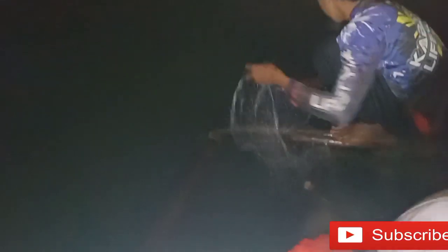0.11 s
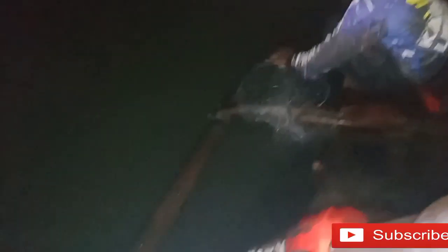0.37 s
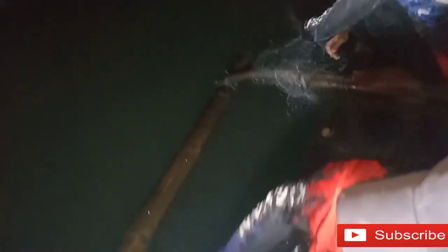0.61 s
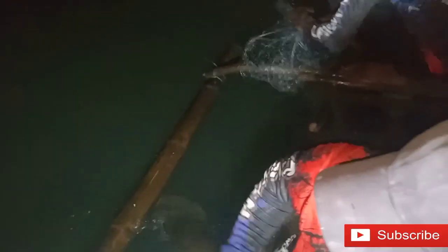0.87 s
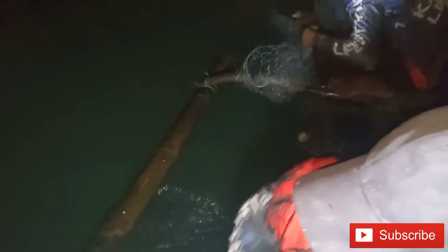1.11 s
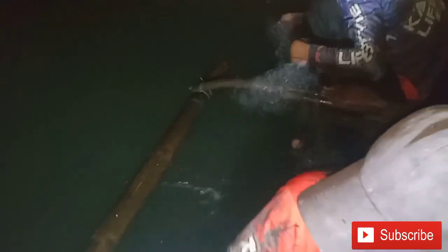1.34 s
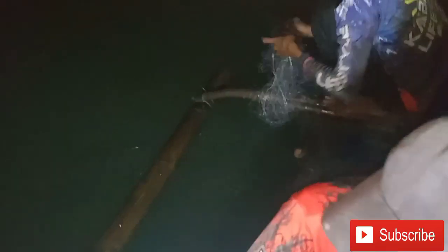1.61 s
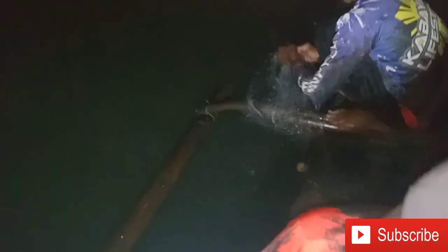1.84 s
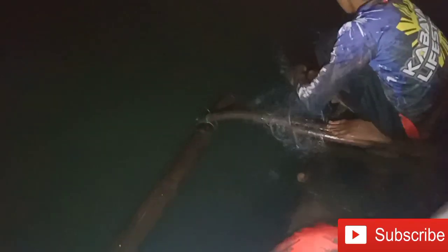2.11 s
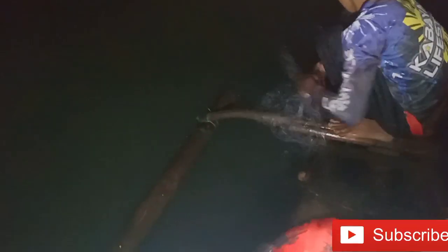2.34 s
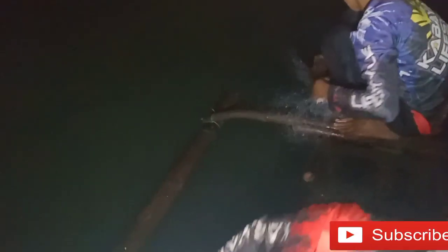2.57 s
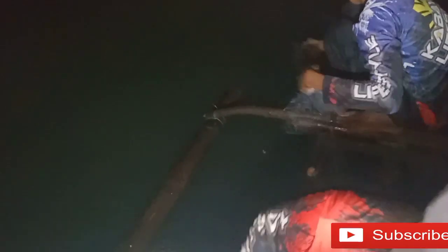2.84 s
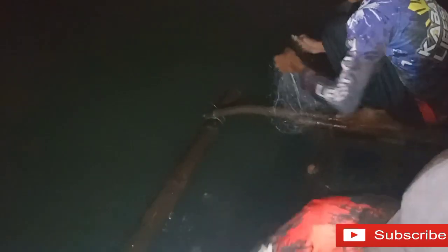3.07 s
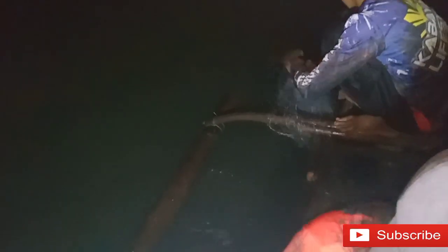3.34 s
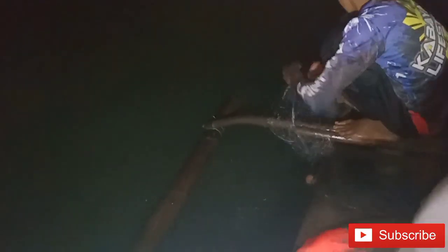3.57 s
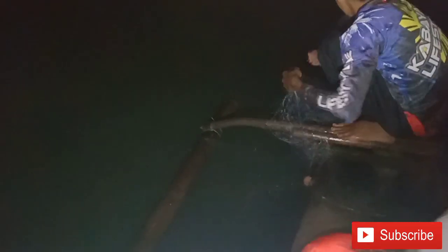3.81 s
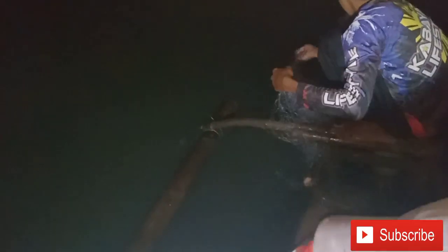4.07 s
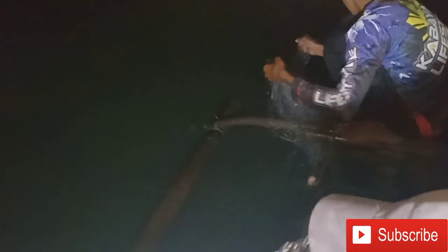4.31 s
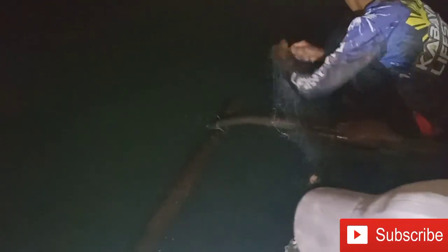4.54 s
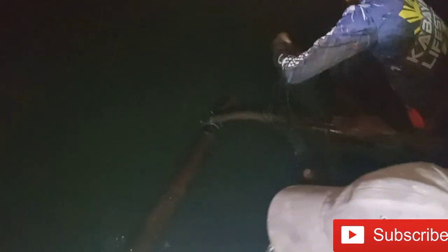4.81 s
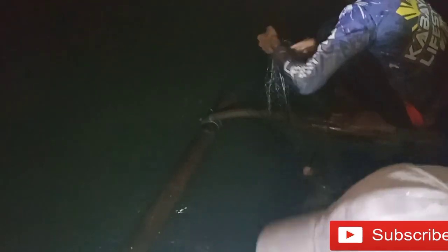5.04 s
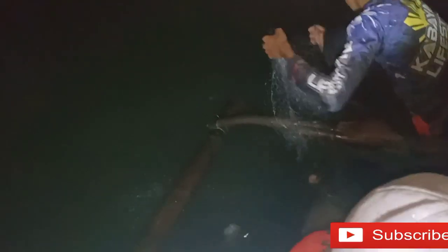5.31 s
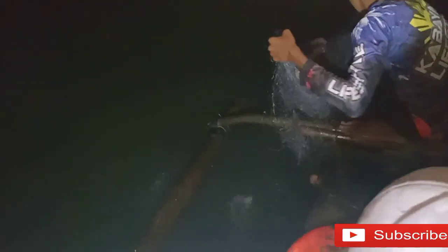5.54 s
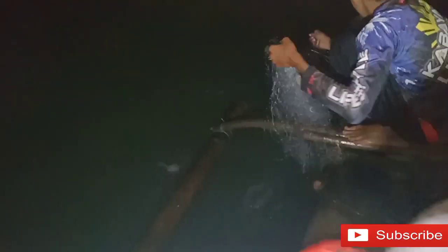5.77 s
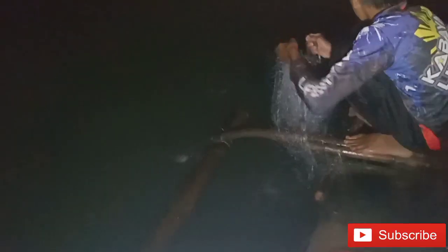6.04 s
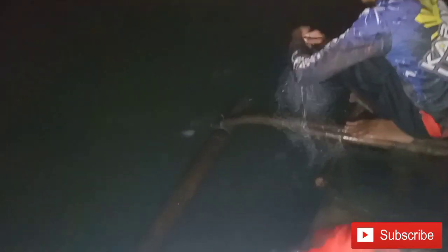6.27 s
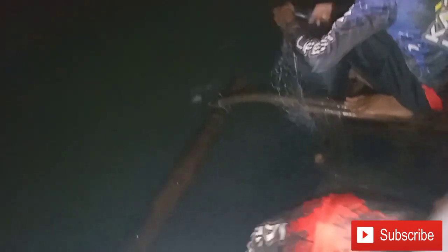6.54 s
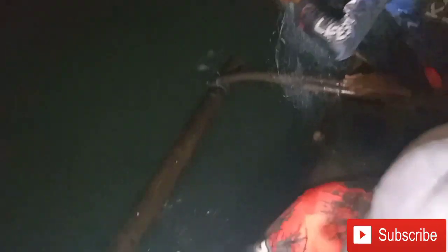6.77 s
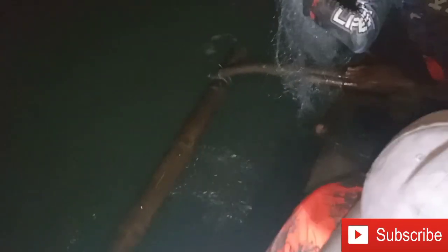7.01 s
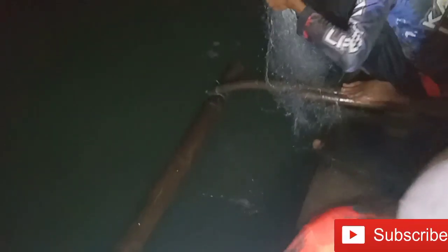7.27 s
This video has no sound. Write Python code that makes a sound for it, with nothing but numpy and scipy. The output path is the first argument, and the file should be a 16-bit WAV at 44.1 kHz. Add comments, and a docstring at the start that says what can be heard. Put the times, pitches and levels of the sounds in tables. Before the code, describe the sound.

Night on a calm river, heard close to the side of a small wooden boat. A low soft murmur, very faint high insects, lapping and tiny drips run throughout. From 0.3 s a wet net stirs the water, with light spray and glugs, building to a strong gurgling slosh and hull thud at 0.9 s, then easing. At 1.7 s a dull wooden knock with a crack. From 1.9 to 2.4 s comes the liveliest splashing: fizzing spray, popping bubbles and bright droplets. It settles, with a soft low thud at 2.8 s. A lighter, brighter knock falls at 3.5 s, followed by sloshes and plops from 3.7 to 4.9 s. A quieter lull follows until about 5.5 s, then renewed gurgling strokes, with strong plops and a low thump at 6.6-6.7 s. Trickling fades after 7 s, leaving a last droplet near 7.3 s. Dry and close, with muted top treble.

```python
"""On a calm river at night, a small microphone stands close to the side of a small wooden boat.
From the start: murmur and a thin band of insects (patchy coloured noise), drips and lapping (bubble crowds).
From 0.3 s wet gear is worked over the side: sloshes of bubble crowds and noise, soon with glugs and chirps
of trapped air and soft hull thuds (damped, gliding sines), and droplets (short pings in a splatter of hiss).
At 1.7 s and 3.5 s the hull is knocked (ringing plank modes and noise cracks); strokes go on to about 7 s."""
import sys
import numpy as np
from scipy import signal
from scipy.fft import rfft, irfft, next_fast_len
from scipy.io import wavfile
from scipy.ndimage import uniform_filter1d, map_coordinates

SR = 44100
rng = np.random.default_rng(int(sys.argv[2]) if len(sys.argv) > 2 else 0)


def dump(signal):
    """Clip the signal to [-1, 1] and save it as 16-bit WAV at the path in sys.argv[1]."""
    limited = np.clip(np.atleast_2d(signal).T, -1, 1)
    pcm = np.round(limited * 32767).astype(np.int16)
    wavfile.write(sys.argv[1], SR, pcm)


def gain_from_db(level_db):
    """Convert decibel levels to linear amplitude factors (20 dB per decade)."""
    decades = np.asarray(level_db, float) / 20
    return 10 ** decades


N = 325899  # length in samples
RISE_DB = 10  # nominal fade over which a chirp's stated climb in pitch takes place


def unit(x):
    """x at rms 1."""
    return x / np.sqrt(np.mean(x ** 2) + 1e-20)


def coloured(x, points):
    """x filtered through (f/Hz, gain/dB) points joined on a log frequency axis."""
    size = next_fast_len(N + 8192)
    hz, db = np.transpose(points)
    log_hz = np.log(np.fft.rfftfreq(size, 1 / SR) + 1)
    gain = gain_from_db(np.interp(log_hz, np.log(hz), db))
    return irfft(rfft(x, size) * gain, size)[..., :N]


def patchy(points, depth_db):
    """Coloured noise of rms 1 whose gain wanders in patches of time and pitch."""
    z = signal.stft(rng.standard_normal(N + 512), nperseg=256)[2]
    field = uniform_filter1d(rng.standard_normal(z.shape), size=5, axis=0)
    field = uniform_filter1d(field, size=8, axis=1)
    noise = signal.istft(z * gain_from_db(depth_db * unit(field)), nperseg=256)[1][:N]
    return unit(coloured(noise, points))


def flutter(rate):
    """A smooth random curve, rate knots a second."""
    knots = rng.standard_normal(int(N * rate / SR) + 4)
    return map_coordinates(knots, [np.arange(N) * rate / SR])


def chirps(s, db, hz, t60, rise, onset_turns, size, rough=0, hold=1):
    """Damped sines that swell over a few turns and climb by rise semitones, as a bubble nearing the surface does."""
    t = np.arange(size) / SR
    db, hz, t60, rise = (np.asarray(v)[:, None] for v in (db, hz, t60, rise))
    fade_db = 60 * t / t60  # the fade at hold 1
    pitch = hz * 2 ** (rise / 12 * np.minimum(fade_db / RISE_DB, 1.5))
    turns = np.cumsum(pitch, axis=1) / SR
    swell = 1 - np.exp(-(turns / onset_turns) ** 2)
    if rough:  # uneven, as from a wobbling pocket wall: size and phase stray a little every few turns
        knots = rng.standard_normal((2, len(db), 64))
        row = np.arange(len(db))[:, None] + 0 * t
        size_stray, phase_stray = (map_coordinates(k, [row, turns / 3 % 63], order=1) for k in knots)
        swell = swell * np.exp(rough * size_stray)
        turns = turns + rough * phase_stray / np.pi
    level_db = db - RISE_DB * (fade_db / RISE_DB) ** hold
    wave = gain_from_db(level_db) * swell * np.sin(2 * np.pi * turns)
    where = np.round(np.asarray(s) * SR).astype(int)[:, None] + np.arange(size)
    return np.bincount(where.ravel(), wave.ravel(), N + size)[:N]


def swarm(count, hz, octaves, turns, scatter_db, rise, size):
    """A random crowd of bubbles of rms 1: log-normal pitch and life, a few much louder than the rest."""
    draw = rng.standard_normal((count, 3))
    pitch = np.clip(hz * 2 ** (octaves * draw[:, 0]), 90, 9500)
    life = np.minimum(turns * np.exp(.6 * draw[:, 1]) / pitch, 2 * size / SR)
    big_db = scatter_db * np.minimum(rng.exponential(size=count), 4)
    start = rng.uniform(0, N / SR, count)
    climb = rise * (1 + draw[:, 2])
    return unit(chirps(start, big_db, pitch, life, climb, onset_turns=2.98, size=size))


# spectrum of the river's murmur: [f/Hz, relative level/dB]
RIVER_SPECTRUM = [(15, -40), (25, -5), (38, 4.5), (86, 3.5), (166, -1), (826, -12), (2920, -22.5),
                  (3910, -24), (6050, -16), (8300, -17.5), (10800, -47), (18300, -120)]


def river():
    """The steady murmur, and insects trilling in a narrow high band: both are patchy noise."""
    murmur = patchy(RIVER_SPECTRUM[:-2] + [(16000, -8.0)], depth_db=2.1)
    insects = patchy([(5200, -50), (5800, -3), (6300, 0), (6900, -50)], depth_db=2.5)
    return gain_from_db(-49.0) * murmur + gain_from_db(-61.5) * insects


def dripping():
    """Tiny drips fall from the wet mesh all the time, each a brief high chirp."""
    return gain_from_db(-62.0) * swarm(count=260, hz=7800, octaves=0.24, turns=34, scatter_db=5.5, rise=0.38, size=500)


# sloshes of stirred water, levels before the layer trims:
# [start t/s, hold t/s, gurgle level/dB, trickle level/dB, spray level/dB]
SLOSH_EVENTS = [(0.276, 0.16, -88, -32, -47.5), (0.372, 0.1, -40.5, -53, -35),
                (0.527, 0.21, -40.5, -32.5, -40.5), (0.773, 0.08, -32, -30, -33.5),
                (0.871, 0.1, -22.5, -25, -30), (0.981, 0.13, -35, -29, -45), (1.146, 0.16, -49, -39.5, -38),
                (1.375, 0.074, -76, -41, -41), (1.491, 0.067, -93, -65, -34.5),
                (1.907, 0.15, -43.5, -30.5, -20), (1.985, 0.31, -36.5, -47, -30),
                (2.109, 0.17, -24, -27, -20), (2.278, 0.24, -28, -36.5, -34.5),
                (2.546, 0.21, -46, -36.5, -66), (2.826, 0.3, -46, -41.5, -54),
                (3.296, 0.31, -80, -70, -41.5), (3.702, 0.063, -38, -33, -31),
                (3.888, 0.024, -39.5, -58, -70), (3.955, 0.17, -35.5, -42.5, -29.5),
                (4.135, 0.12, -29.5, -36, -26.5), (4.317, 0.17, -31.5, -46, -52),
                (4.514, 0.069, -33, -35, -37), (4.672, 0.16, -38.5, -42, -43), (4.96, 0.14, -52, -48, -45),
                (5.547, 0.12, -66, -60, -42), (5.785, 0.051, -36, -41, -40), (5.961, 0.2, -40.5, -44, -41),
                (6.082, 0.056, -30, -33, -27), (6.212, 0.26, -32, -37.5, -33),
                (6.569, 0.097, -31.5, -43, -28), (6.709, 0.19, -39, -36.5, -41),
                (6.928, 0.24, -53, -49.5, -39.5)]
# how fast the layers settle after a slosh: gurgle, trickle, spray [dB per s]
SLOSH_SETTLE = [197.5, 162, 240]
# the same layers while the water is left alone, before the trims: [level/dB]
LAPPING_LEVELS = [-65.5, -51.5, -49.5]


def slosh_levels():
    """Each slosh swells, holds and settles; their powers add over the quiet lapping. dB of the three layers."""
    attack_s = 0.0064
    s, hold, *peaks_db = np.transpose(SLOSH_EVENTS)
    t = np.arange(0, N / SR + .01, .002)
    since = t - s[:, None]
    swell = np.clip(since / attack_s, 0, 1) ** 2
    late = np.maximum(since - attack_s - hold[:, None], 0)
    levels = []
    for db, fall, calm in zip(peaks_db, SLOSH_SETTLE, LAPPING_LEVELS):
        power = (swell * gain_from_db(db[:, None] - fall * late) ** 2).sum(axis=0) + gain_from_db(calm) ** 2
        levels.append(np.interp(np.arange(N) / SR, t, 10 * np.log10(power)))
    return levels


# spectrum of fizzing spray and splatter, played in part: [f/Hz, relative level/dB]
FIZZ_SPECTRUM = [(880, -22), (1500, -17), (3520, -18.5), (4680, -15), (5680, -24), (6700, -9.5),
                 (8300, -14.5), (10800, -36), (18300, -120)]


def stirred_water():
    """Gurgling, trickling and spraying water: crowds of ever smaller bubbles, each over its own rushing noise."""
    gurgle_db, trickle_db, spray_db = slosh_levels()
    surge = swarm(count=450, hz=201.0, octaves=0.357, turns=18, scatter_db=3.5, rise=0.41, size=6000)
    gurgle = swarm(count=1500, hz=774.4, octaves=0.573, turns=33.2, scatter_db=3.5, rise=1.094, size=2600)
    gurgle_rush = [(200, -22.0), (450, -17.0), (1100, -6.5), (2000, -19.5), (4000, -51)]
    gurgle += gain_from_db(-6.5) * patchy(gurgle_rush, depth_db=4)
    slosh = unit(gurgle) + gain_from_db(-15.0) * surge  # the surge is the deep part of the gurgle

    trickle = swarm(count=3000, hz=2407, octaves=0.399, turns=40.0, scatter_db=4.0, rise=0.48, size=800)
    trickle += gain_from_db(-1.5) * patchy([(1000, -31.5), (2000, 0), (3100, 10.0), (4800, -7.5)], depth_db=3)

    spray = swarm(count=6000, hz=6410, octaves=0.432, turns=12.3, scatter_db=1.5, rise=0.46, size=300)
    spray += gain_from_db(5) * patchy([(2800, -20)] + FIZZ_SPECTRUM[3:-2] + [(16000, -8)], depth_db=4.5)

    clumps_db = 2.3 * flutter(rate=30)  # water falls in clumps, so the layers flare together
    gurgle_db = gurgle_db + 0.43 * clumps_db
    trickle_db = trickle_db + clumps_db
    spray_db = spray_db + clumps_db + 4.56 * flutter(rate=150)  # the spray flickers faster as well
    water = gain_from_db(gurgle_db - 6) * slosh
    water += gain_from_db(trickle_db - 9.0) * unit(trickle)
    return water + gain_from_db(spray_db - 7.5) * unit(spray)


# air pockets and bubbles; the low rows near 0.88, 2.24, 2.84 and 4.5 s are soft thuds of the hull:
# [t/s, level/dB, f/Hz, nominal t60/s (10 dB down after a sixth of it)]
POCKETS_AND_THUDS = [(0.3851, -20, 740, 0.17), (0.5646, -21, 930, 0.07), (0.626, -28, 792, 0.13),
                     (0.672, -31.5, 691, 0.25), (0.794, -21.5, 610, 0.12), (0.853, -17, 1244, 0.031),
                     (0.879, -12.5, 296, 0.15), (0.88, -0.5, 610, 0.021), (0.882, -11.5, 227, 0.15),
                     (0.888, -19, 1164, 0.12), (0.916, -18, 184, 0.21), (1.165, -31, 702, 0.29),
                     (1.587, -30.5, 538, 0.048), (1.9302, -16, 1000, 0.039), (1.9413, -14, 1440, 0.039),
                     (1.996, -5, 1100, 0.011), (2.011, -17, 1190, 0.034), (2.1521, -9, 737, 0.038),
                     (2.172, -3, 980, 0.021), (2.244, -24.5, 247, 0.2), (2.454, -12, 570, 0.035),
                     (2.488, -19, 701, 0.13), (2.836, -16, 498, 0.056), (2.844, -19.5, 236, 0.2),
                     (2.843, -24.5, 159.4, 0.33), (2.971, -26.5, 346, 0.16), (2.975, -33.5, 986, 0.15),
                     (3.705, -19.5, 376, 0.031), (3.99, -28, 751, 0.24), (4.0363, -14.5, 672, 0.04),
                     (4.1559, -19.5, 820, 0.065), (4.223, -24.5, 1110, 0.036), (4.2414, -24.5, 523, 0.19),
                     (4.3411, -14.5, 625, 0.053), (4.39, -24, 725, 0.04), (4.43, -28, 556, 0.1),
                     (4.492, -28.5, 960, 0.064), (4.495, -20.5, 165.5, 0.16), (4.538, -23, 165, 0.096),
                     (4.585, -26, 682, 0.047), (4.783, -29.5, 1056, 0.079), (4.647, -33.5, 166, 0.23),
                     (4.7326, -6.5, 880, 0.014), (4.9633, -34, 1290, 0.047), (5.658, -28.5, 1510, 0.037),
                     (5.7584, -15, 1300, 0.019), (5.811, -31, 1230, 0.064), (5.981, -27.5, 1257, 0.12),
                     (6.019, -24, 1070, 0.11), (6.0427, -18, 1168, 0.072), (6.0555, -14, 766, 0.025),
                     (6.1, -20, 550, 0.039), (6.122, -29, 698, 0.15), (6.176, -39.5, 129, 0.94),
                     (6.2334, -27, 744, 0.19), (6.365, -25.5, 696, 0.134), (6.597, -7, 690, 0.041),
                     (6.714, -13.5, 1060, 0.014), (6.7139, -11, 346, 0.12), (6.7187, -15, 630, 0.03),
                     (6.717, -3.5, 197, 0.036), (6.823, -16.5, 583, 0.029), (6.448, -23.5, 1167, 0.042),
                     (6.5046, -23.5, 1190, 0.04), (6.968, -38, 478, 0.097)]
# pockets that drain or fill, so that their pitch sweeps widely:
# [t/s, level/dB, f/Hz, nominal t60/s (as above), semitones gained while fading by RISE_DB]
SWEEPING_POCKETS = [(2.313, -20, 358, 0.078, -4.5), (4.815, -41, 314, 0.24, 9.5),
                    (4.852, -47, 339, 0.49, 9), (6.596, -17, 880, 0.077, 5.5),
                    (6.747, -17.5, 179.4, 0.32, 11)]


def bubbles_and_thuds():
    """Clear glugs, plops and soft hull thuds, all climbing a little as they fade; a few pockets sweep widely."""
    s, db, hz, t60 = np.transpose(POCKETS_AND_THUDS)
    climb = 1.53 + 0 * s  # semitones gained while fading by RISE_DB
    # hold over 1: the level is kept, then dies quickly, as when a pocket bursts
    plops_and_thuds = chirps(s, db, hz, t60, climb, onset_turns=1.2, size=SR // 4, rough=.36, hold=1.43)
    sweeps = chirps(*np.transpose(SWEEPING_POCKETS), onset_turns=1.5, size=SR // 6, rough=.2, hold=2.6)
    return plops_and_thuds + sweeps


# droplets striking water; the row at 3.525 s is a light touch on the hull just before the knock:
# [t/s, level/dB before the ping and splatter trims, f/Hz]
DROPLETS_AND_TOUCH = [(0.388, -16, 4640), (0.424, -6.5, 4530), (0.44, -19.5, 3900), (0.699, -18, 2200),
                      (0.8251, -19, 2070), (0.871, -17.5, 6030), (0.9005, -25, 5530), (0.9466, -12.5, 5580),
                      (1.0203, -22.5, 6200), (1.08, -29, 2050), (1.174, -17, 2600), (1.2785, -22, 3520),
                      (1.3149, -24.5, 6000), (1.4171, -8.5, 6410), (1.4432, -23.5, 1850),
                      (1.5329, -18.5, 5085), (1.8997, -12.5, 2420), (1.9306, -11, 2430), (1.9418, -7, 6640),
                      (1.9988, -8, 8560), (2.013, -7.5, 4300), (2.051, -12, 7100), (2.058, -14, 7500),
                      (2.139, 0.5, 4920), (2.1692, -4, 5970), (2.2116, -4, 7570), (2.2192, -11.5, 4550),
                      (2.2349, -2, 7300), (2.253, -11.5, 4720), (2.394, -18.5, 4260), (2.52, -18.5, 5150),
                      (2.589, -27, 2110), (2.607, -26, 3560), (2.6814, -26.5, 1506), (3.1371, -28, 2200),
                      (3.2714, -19.5, 7900), (3.411, -22, 7450), (3.525, -29, 3150), (3.707, -25, 2300),
                      (3.737, -28.5, 1480), (3.758, -13.5, 2950), (3.8244, -30, 4170),
                      (3.9663, -13.5, 6730), (4.059, -32, 6040), (4.078, -27, 2950), (4.147, -18.5, 3800),
                      (4.1852, -9.5, 6400), (4.256, -11.5, 7200), (4.3822, -20, 4830), (4.5418, -17, 7800),
                      (4.6046, -29, 1780), (4.781, -26.5, 2370), (4.9296, -28, 6900), (4.9655, -24.5, 2420),
                      (5.013, -27.5, 2320), (5.2628, -22.5, 2610), (5.7656, -21.5, 2370),
                      (5.782, -23, 2410), (5.9712, -19.5, 4060), (6.1016, -21.5, 2980), (6.125, -22, 7140),
                      (6.387, -20, 3720), (6.4098, -18, 2840), (6.7987, -27, 2160), (6.893, -32, 2160),
                      (6.9187, -19, 3390), (6.963, -27.5, 2350), (7.2816, -16.5, 4150)]


def drops_and_touch():
    """Each droplet is a short ping of a tiny bubble in a splatter of hiss; one light hull touch is made alike."""
    ping_db, splatter_db = 5.5, -14.5  # trims on the level of each row
    fade_turns = 34  # cycles to fade 60 dB
    s, db, hz = np.transpose(DROPLETS_AND_TOUCH)
    out = chirps(s - .0008, db + ping_db, hz, fade_turns / hz, .5 + 0 * s,
                 onset_turns=3.24, size=2048, rough=0.41)
    t = np.arange(-300, 900) / SR
    burst = np.where(t < 0, np.exp(t / 0.0018), np.exp(-t / 0.005))  # hiss grows before the hit, then dies
    high = hz >= 5000  # Hz; smaller droplets splatter in the treble only
    top = [(16000, -25)]
    full_colour = FIZZ_SPECTRUM[:-2] + top
    treble_colour = [(3600, -59)] + FIZZ_SPECTRUM[3:-2] + top
    for chosen, colour in [(~high, full_colour), (high, treble_colour)]:
        hits = np.bincount(np.round(s * SR).astype(int), gain_from_db(db + splatter_db) * chosen, N)
        envelope = signal.fftconvolve(hits, burst)[300:][:N]
        out = out + envelope * patchy(colour, depth_db=2.5)
    return out


# blows on the hull: [t/s, level/dB, brightness/dB per octave about 500 Hz, crack against level/dB]
HULL_BLOWS = [(1.696, -14.5, -3, 7.5), (3.538, -15.5, 3, -0.5)]
# modes of the hull planks: [f/Hz, level against the blow/dB, t60/s]
PLANK_MODES = [(151.5, -9.5, 0.16), (255.7, -3.5, 0.13), (303.5, -2.5, 0.086), (417, -0.5, 0.11),
               (779, -5.5, 0.041), (1060, 1.5, 0.027), (1228, -7, 0.075), (2430, -3.5, 0.02),
               (2950, -2, 0.012)]


def hull():
    """A light touch, then the blow: each plank mode rings unevenly under a crack of noise."""
    s, db, tilt_db, crack_db = np.transpose(HULL_BLOWS)
    out, t = np.zeros(N + SR), np.arange(SR // 4) / SR
    for hz, level, t60 in PLANK_MODES:
        mode_db = db + level + tilt_db * np.log2(hz / 500)
        out[:N] += chirps(s, mode_db, hz + 0 * s, t60 + 0 * s, 0 * s, onset_turns=.5, size=SR // 4, rough=.5)
    for start, peak_db in zip(s, db + crack_db):
        for early, down_db in [(0, 4.5), (.011, -29)]:  # the blow, and the touch 11 ms before it
            envelope = gain_from_db(peak_db + down_db - 60 * t / 0.031) * (1 - np.exp(-t / 0.0029))
            crack = envelope * rng.standard_normal(len(t))
            out[round((start - early) * SR):][:len(t)] += crack
    return out[:N]


def reflections(x):
    """Early answers from the hull and the water surface: a noise tail fading 60 dB in 75 ms."""
    t = np.arange(SR // 8) / SR
    tail = rng.standard_normal(len(t)) * gain_from_db(-60 * t / 0.075)
    return signal.fftconvolve(x, tail / np.linalg.norm(tail))[:N]


def scene():
    """Near sounds with their weak reflections, over the stirred water, the drips and the river."""
    background = river() + dripping() + stirred_water()
    near = bubbles_and_thuds() + drops_and_touch() + hull()
    return (background + near + gain_from_db(-8) * reflections(near))[None]


def roll_off(x):
    """The treble ends steeply here."""
    return signal.sosfilt(signal.butter(12, 16120, fs=SR, output="sos"), x)


# response of the microphone chain: [f/Hz, gain/dB]
MICROPHONE_RESPONSE = [(40, -11), (120, 7.5), (8300, 3), (9000, -13), (10500, -24), (12500, -37.5),
                       (15500, -47)]


def record(dry):
    """The loudest peaks clip; then the microphone chain loses deep bass and high treble."""
    clipped = dry / (1 + np.abs(dry / .5) ** 8) ** (1 / 8)
    mix = coloured(clipped, MICROPHONE_RESPONSE)
    return roll_off(mix)


dry = scene()
out = record(dry)
dump(out)
```